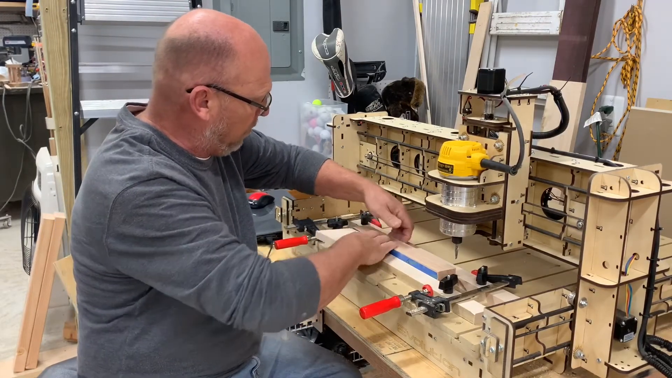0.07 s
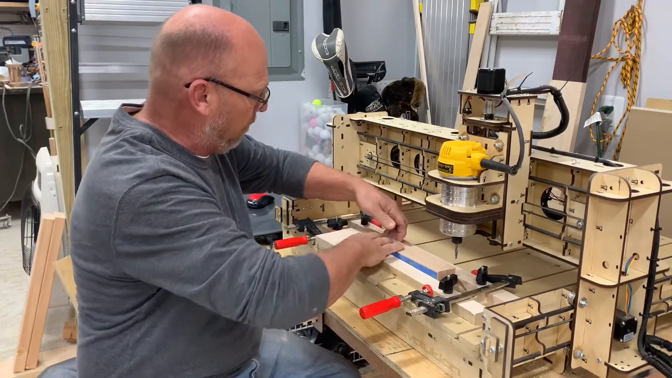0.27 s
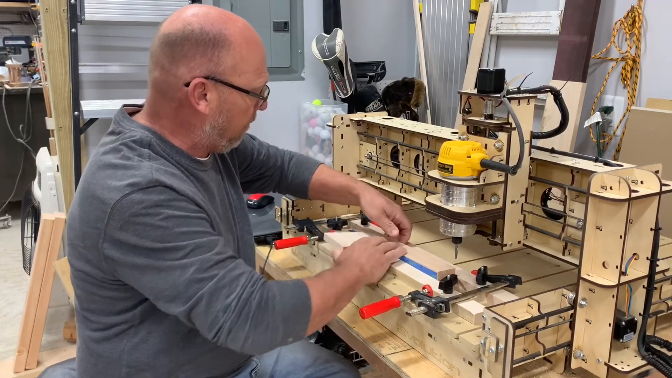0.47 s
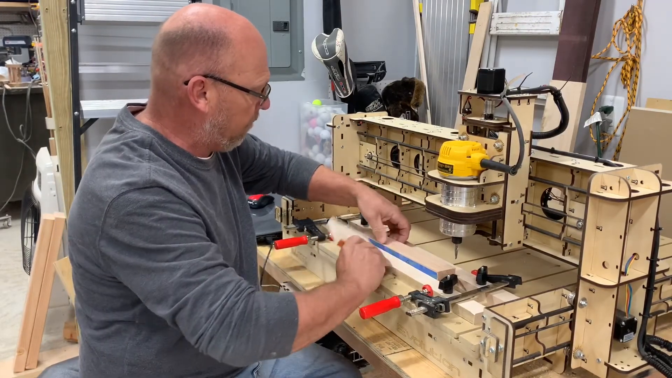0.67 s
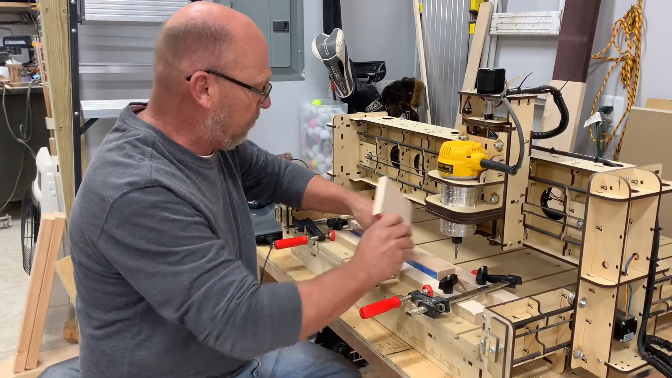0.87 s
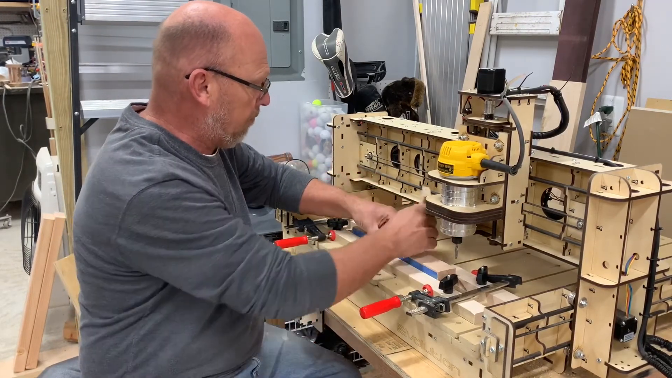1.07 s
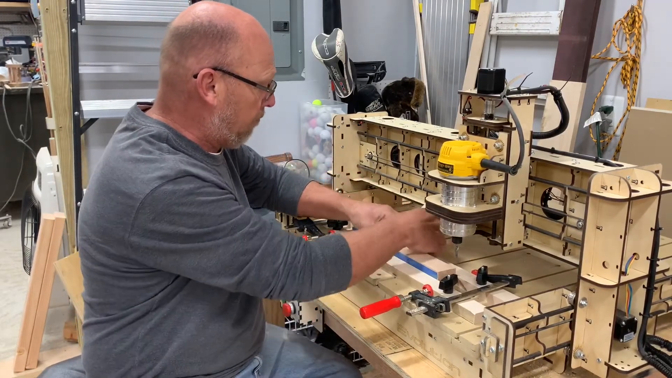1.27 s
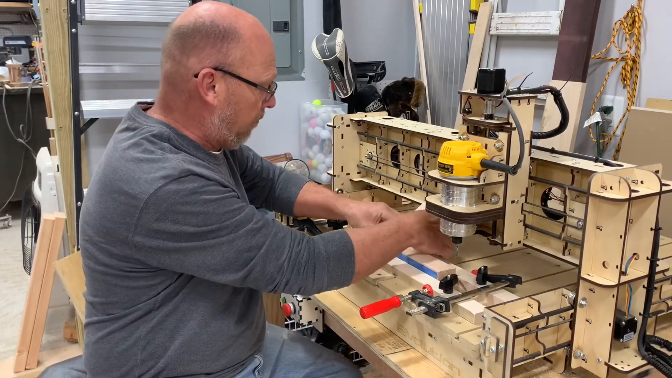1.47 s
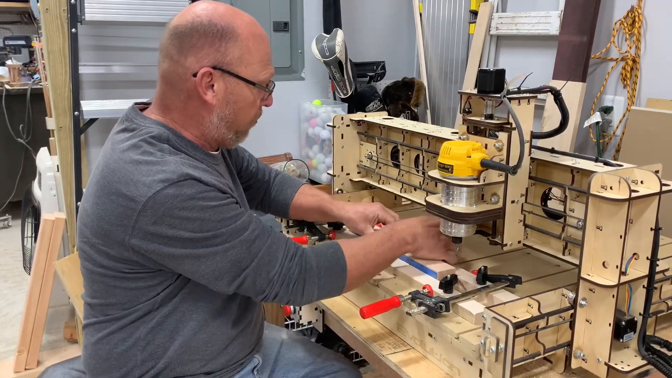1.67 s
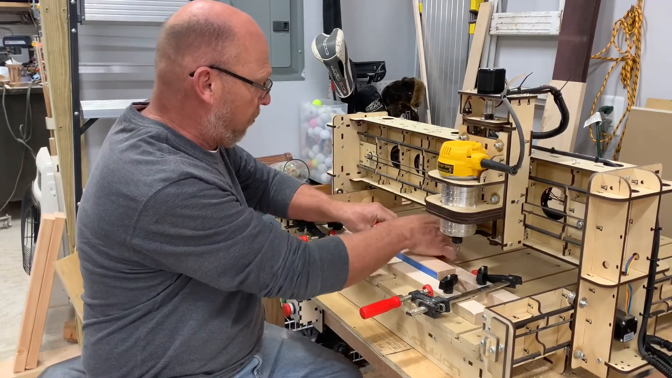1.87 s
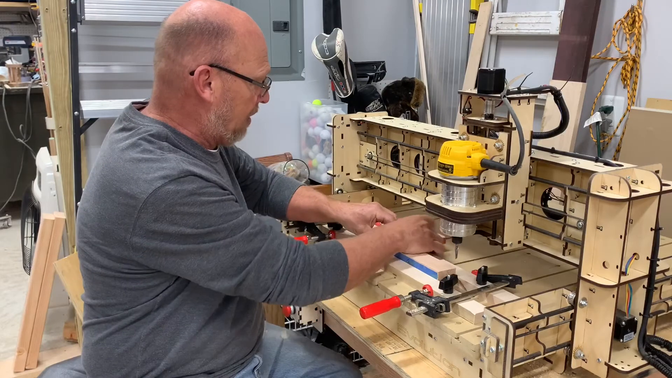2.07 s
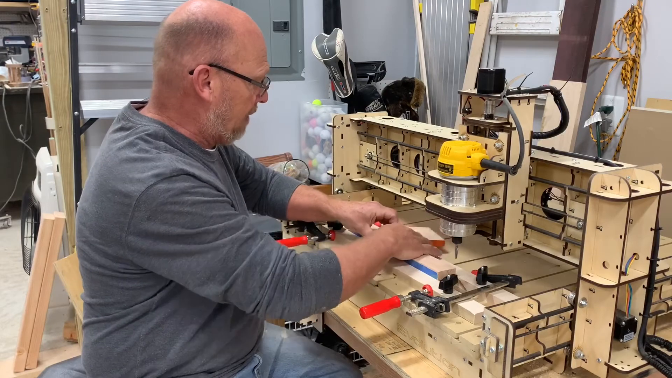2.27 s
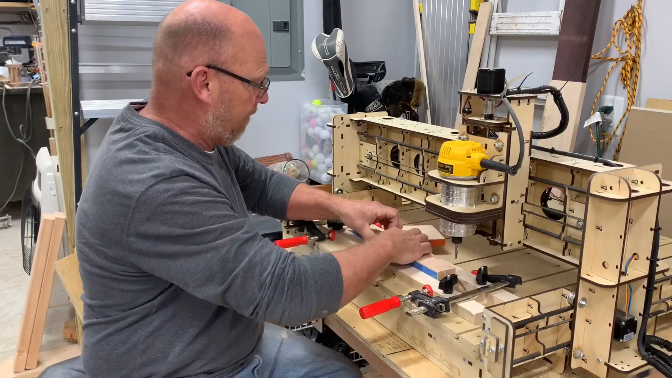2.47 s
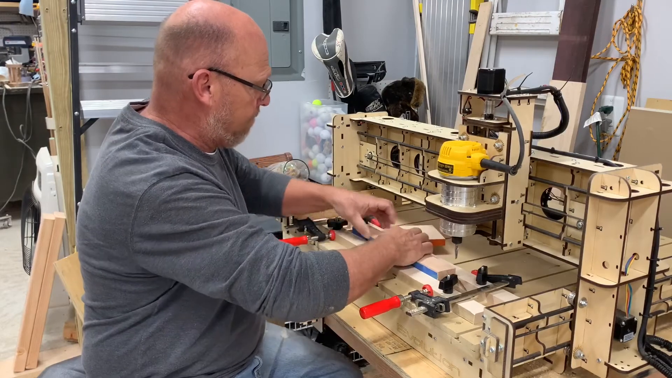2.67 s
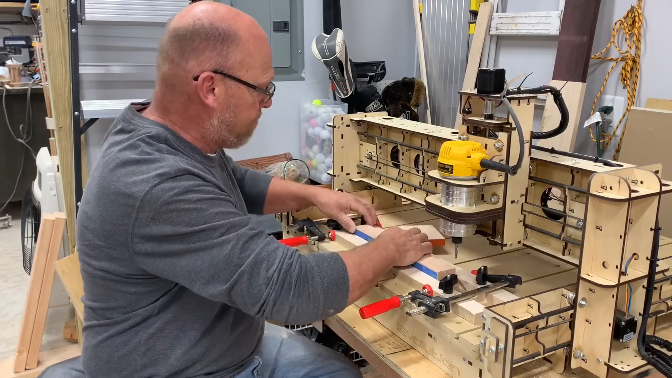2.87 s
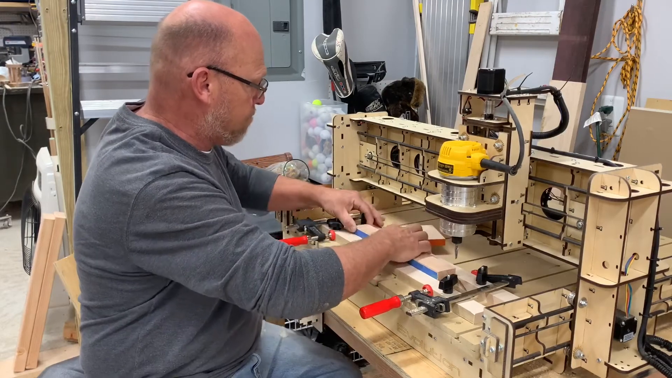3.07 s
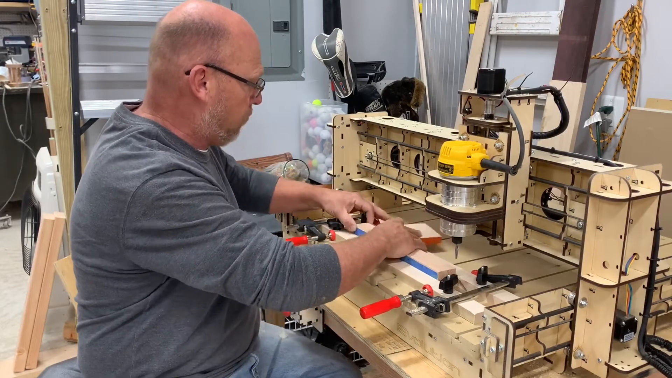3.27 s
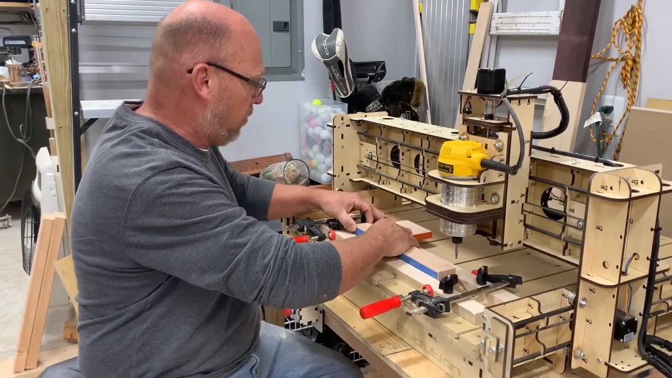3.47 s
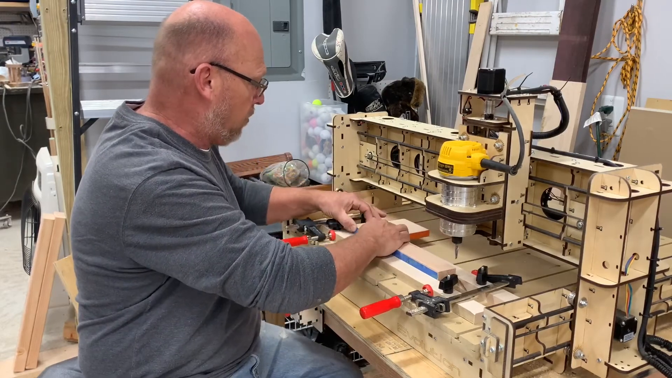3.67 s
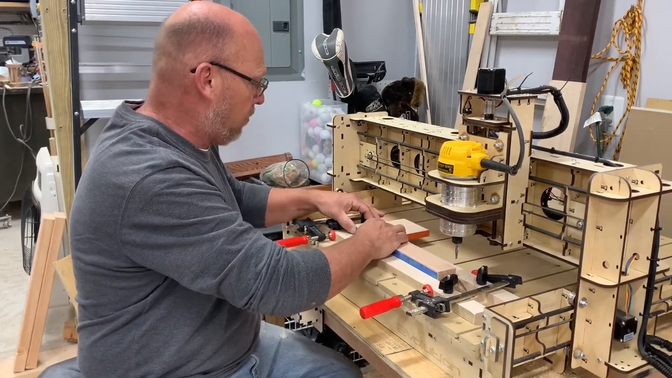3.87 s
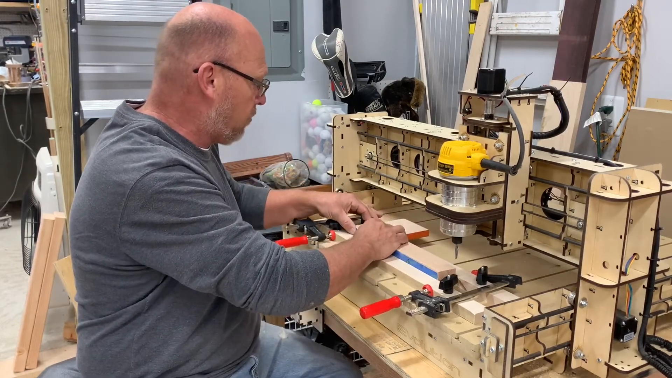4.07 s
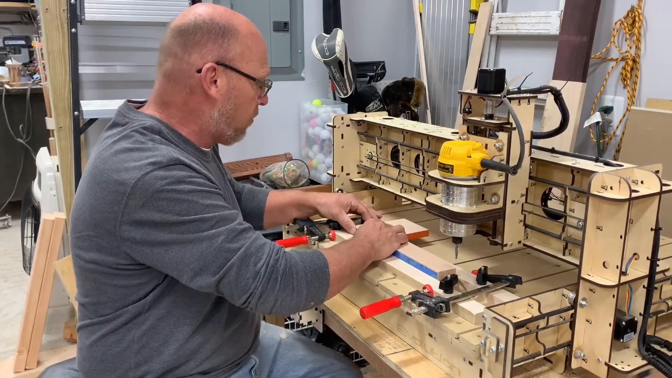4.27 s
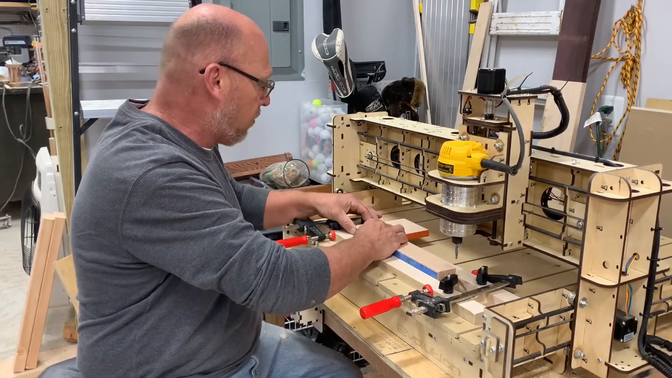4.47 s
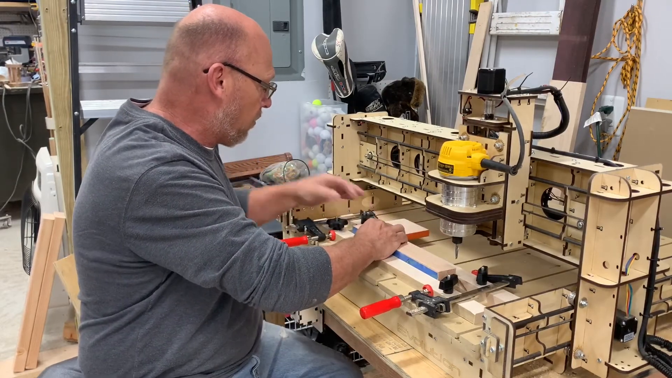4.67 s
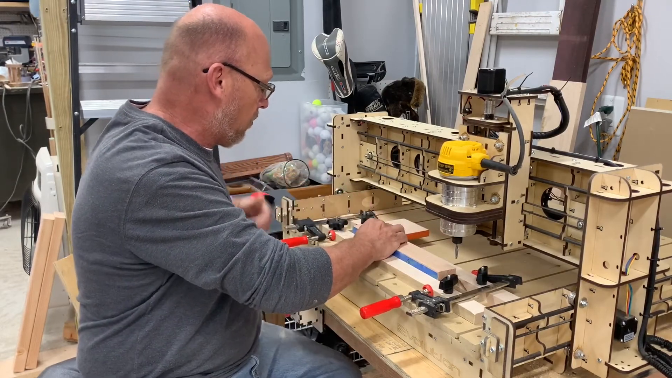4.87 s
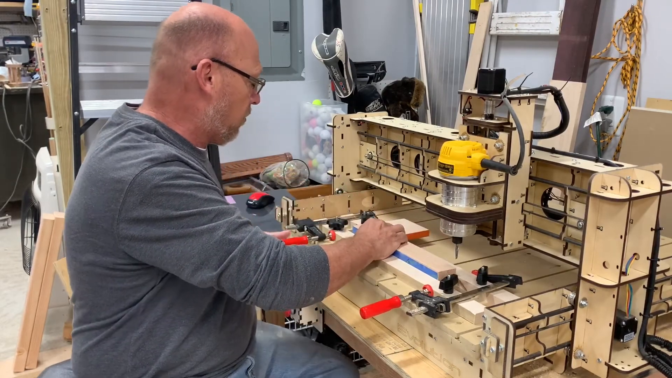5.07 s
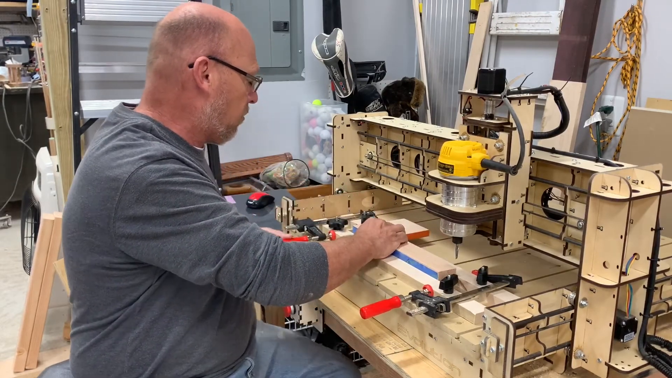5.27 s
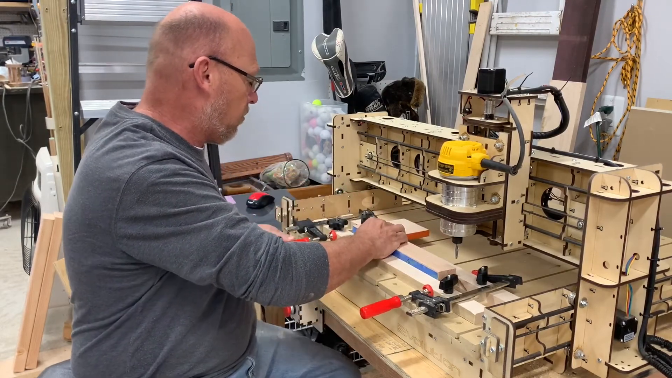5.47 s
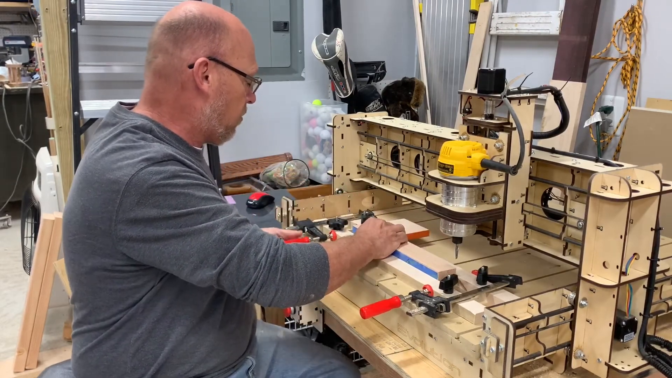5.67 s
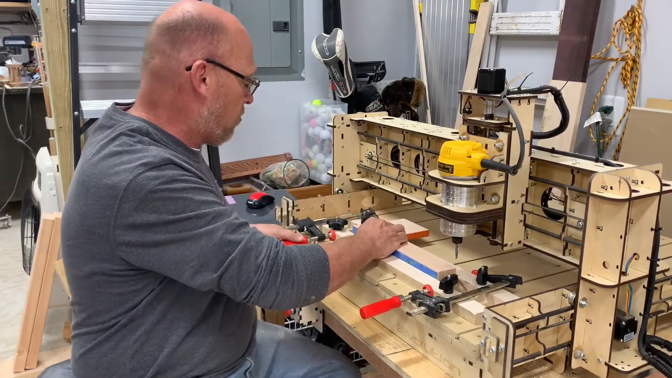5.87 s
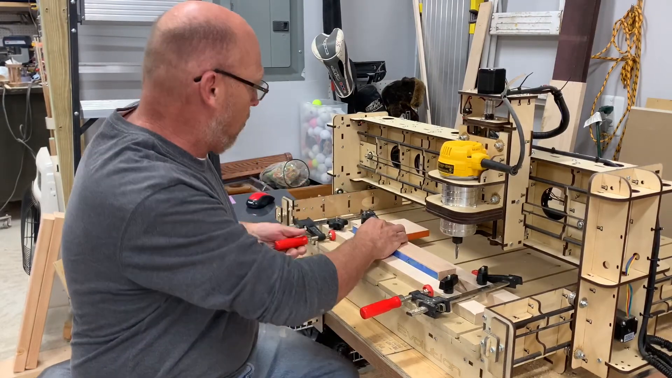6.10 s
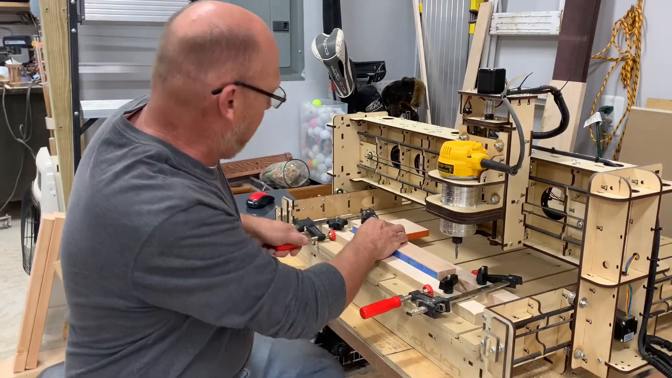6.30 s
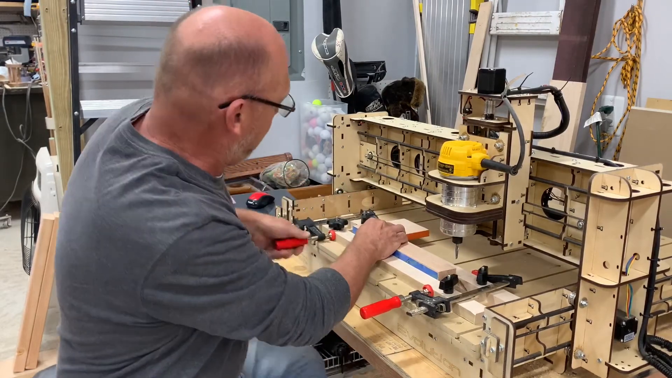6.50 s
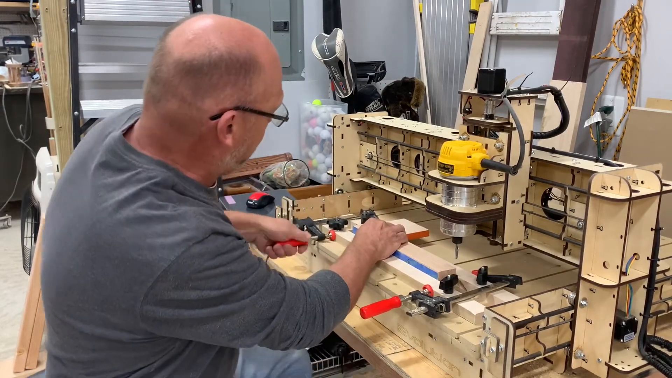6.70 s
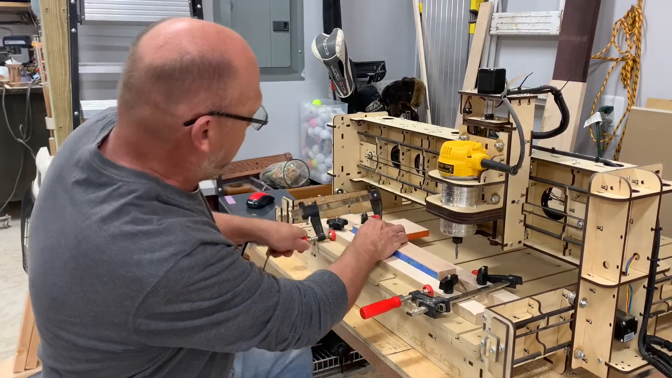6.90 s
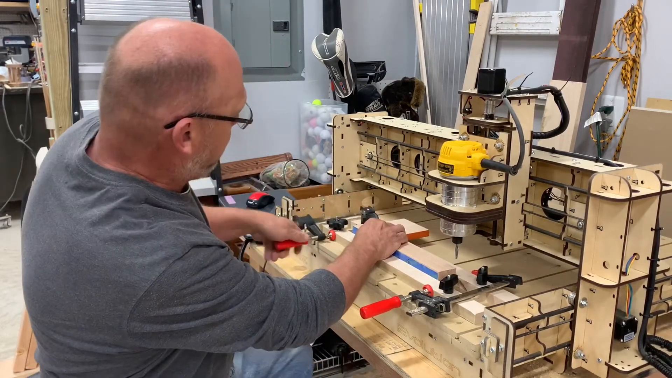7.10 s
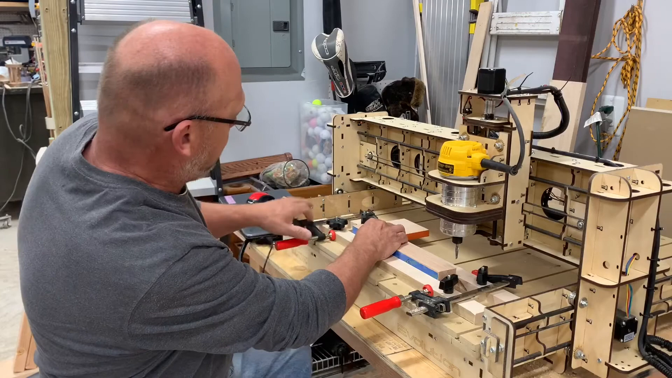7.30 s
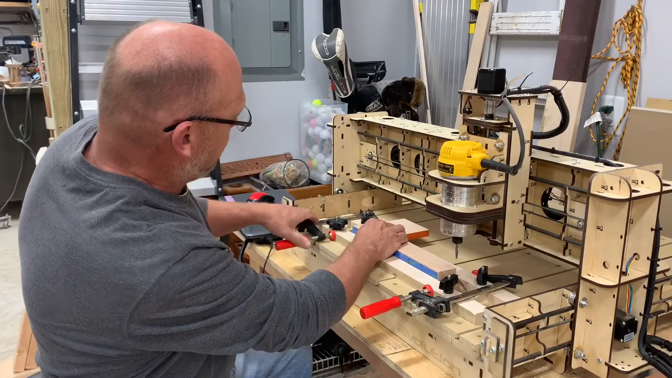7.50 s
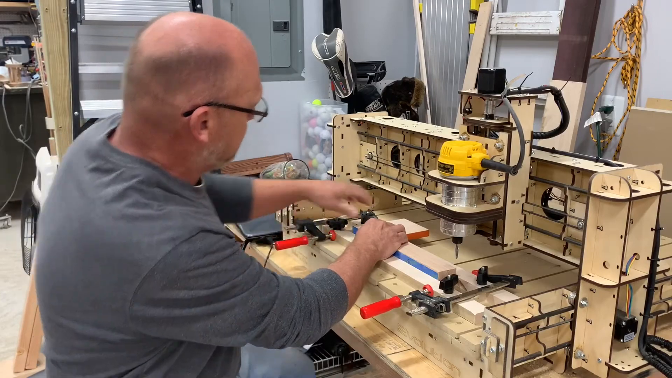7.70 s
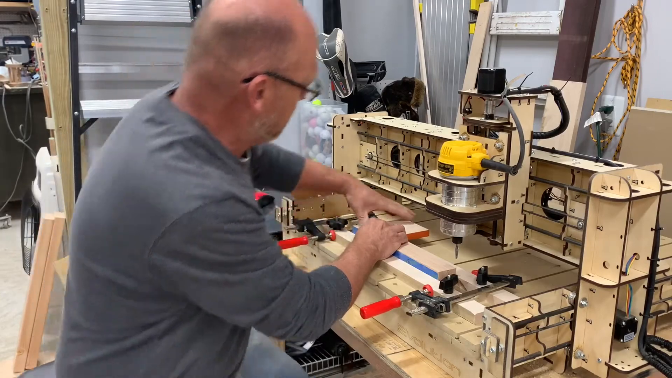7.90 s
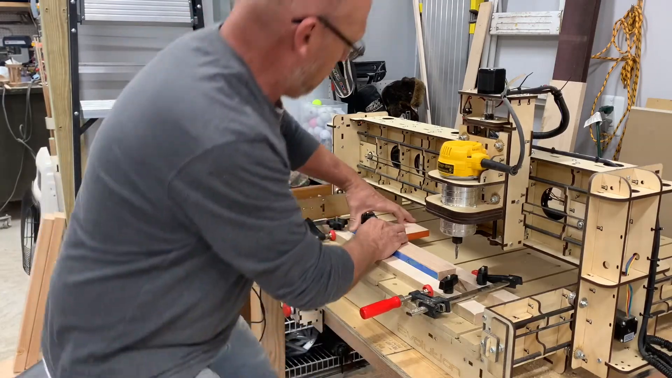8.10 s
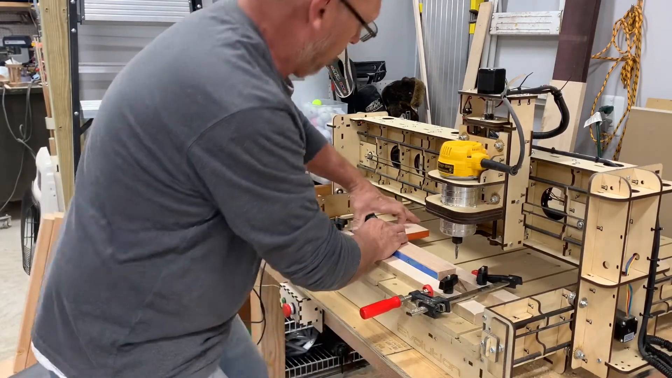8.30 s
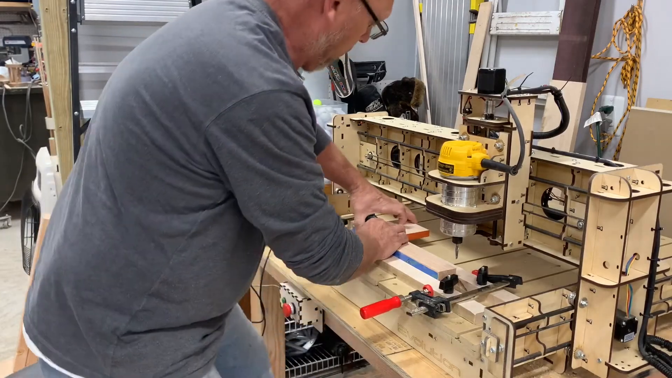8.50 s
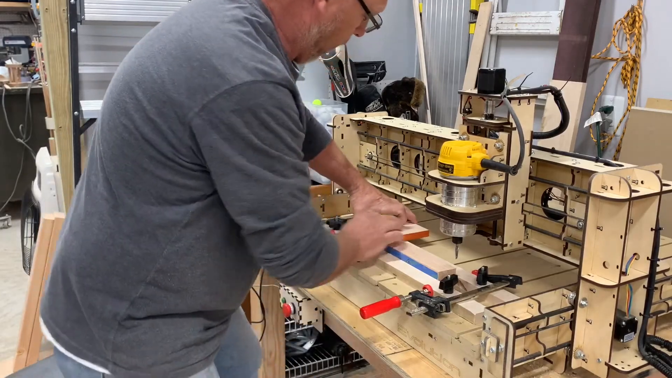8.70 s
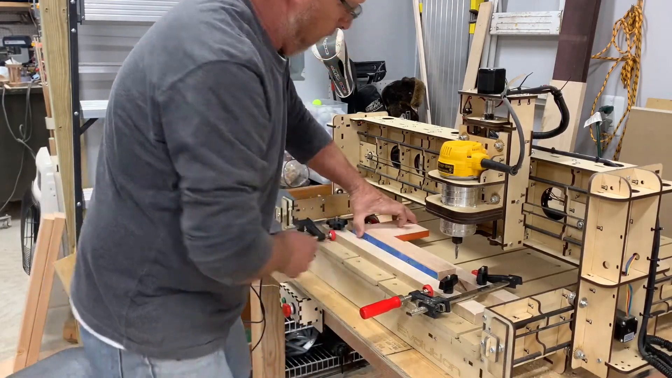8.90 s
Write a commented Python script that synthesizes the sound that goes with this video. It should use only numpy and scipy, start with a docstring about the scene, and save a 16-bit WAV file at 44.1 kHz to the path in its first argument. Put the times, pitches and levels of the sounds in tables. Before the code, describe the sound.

Close stereo pickup in a quiet workshop with a short room ring. A board is knocked and scuffed onto a hollow plywood bed, then come soft fingertip taps. Clamp parts rattle and scrape, a rod slides with a brief mid-pitched singing tone, and two hard snaps follow. A low creaking groan and faint handling end it, over a low hum.

```python
"""A quiet workshop: filtered noise gives faint air and a low hum that swells at times, sines a thin whine.
A board is laid on a plywood machine bed and tapped into place: blows excite resonances of wood and bed.
Hands and wood scuff over the bed as swells of shaped noise; rubbed parts squeak as ringing noise.
Then it is clamped: a clamp rod sings as it slides, with octave and upper modes, and a lever snaps shut.
Decaying noise tails let the room ring for up to half a second."""
import sys
import numpy as np
from scipy import signal
from scipy.fft import rfft, irfft, next_fast_len
from scipy.io import wavfile
from scipy.ndimage import map_coordinates

SR = 44100
rng = np.random.default_rng(int(sys.argv[2]) if len(sys.argv) > 2 else 0)


def waveform_to_disk(signal):
    """Save audio, clipped to [-1, 1], as 16-bit WAV at the path in sys.argv[1]."""
    frames = np.transpose(np.atleast_2d(signal))
    scaled = np.clip(frames, -1, 1) * 32767
    samples = np.round(scaled).astype(np.int16)
    wavfile.write(sys.argv[1], SR, samples)


N = 394650

# Every spectrum level is relative: the layer's loudness is set elsewhere.
# Low hum: spectrum (freq_hz, level_db per Hz)
HUM_SPECTRUM = [(12, -68.5), (20, -33.5), (32, -24.5), (41, -13), (59, 2), (113, -2), (176, -25.5),
                (200, -10.5), (260, -37.5), (440, -120)]
# Its loudness, swelling at times, as after the heavy blow near 7.2 s: (time_s, level_db before it wavers)
HUM_LEVEL = [(0.0, -60.5), (0.45, -62.5), (3.0, -61.5), (3.49, -55), (3.7, -58.5), (5.8, -60.5), (6.0, -50),
             (6.45, -57.5), (7.05, -62), (7.22, -40.5), (7.6, -63), (7.88, -53), (8.1, -59), (8.95, -56)]
# Air noise: spectrum (freq_hz, level_db per Hz)
AIR_SPECTRUM = [(88, -32.5), (150, -4.5), (495, -25), (608, -25.5), (1150, -34), (6760, -40.5),
                (8460, -50.5), (9460, -43), (10600, -40.5), (12100, -43), (13000, -57)]
AIR_DB = -70.5  # rms
# Pair of high electric tones: (pitch_hz, level_db rms before they waver)
WHINE_TONES = [(14874, -62.5), (14939, -68)]

# Swells of rubbing noise, some leading into knocks:
# (fullest_s, rise_s, fall_s, rub_db before the mix, hiss_over_rub_db, rumble_over_rub_db)
RUB_SWELLS = [(0.047, 0.091, 0.075, -56.5, -10.5, 3.5), (0.468, 0.22, 0.19, -55, -9, 1.5),
              (0.584, 0.061, 0.064, -52.5, -4, 6), (1.0, 0.18, 0.12, -69.5, -13, 14.5),
              (1.455, 0.047, 0.11, -70, -5, 9), (1.548, 0.08, 0.043, -48, -7, -2),
              (1.87, 0.15, 0.12, -62.5, -9.5, 16.5), (2.03, 0.18, 0.21, -62.5, -10, 4),
              (2.3, .08, 0.07, -79, -12, 32), (2.412, 0.04, 0.13, -78.5, -11, 28),
              (3.0, 0.067, 0.079, -77.5, -8, 14.5), (3.251, 0.17, 0.12, -64, -3.5, 10.5),
              (3.66, 0.13, 0.09, -68.5, -21, 8), (3.78, 0.17, 0.45, -86, -13.5, 24.5),
              (3.97, 0.11, 0.12, -76, -12, 11), (5.765, 0.033, 0.096, -63, -10, 13),
              (5.85, .06, .05, -67, 1, 5), (5.935, .035, 0.24, -52, 6.5, 1),
              (6.02, .12, 0.1, -50.5, 8, -15), (6.25, 0.48, 0.18, -64.5, -3, 13.5),
              (6.51, 0.13, 0.25, -46.5, 0.5, 8), (6.648, 0.27, 0.08, -45, -6, 10),
              (6.9, 0.1, 0.36, -75, -8, 9.5), (7.12, 0.11, 0.091, -56, 10, 0),
              (7.49, 0.056, 0.081, -60.5, 4, -1.5), (7.585, 0.11, 0.14, -53, 12.5, 0),
              (7.921, 0.23, 0.206, -53.5, -3, 14), (8.053, 0.094, 0.15, -55, 3, -5),
              (8.271, 0.12, 0.28, -68.5, -1, 12), (8.6, 0.076, 0.12, -76, -3.5, 11.5),
              (8.76, 0.11, .08, -77.5, -1.5, 14.5), (8.95, 0.18, .1, -65.5, 1.5, 7)]
SWELL_FADE_DB, SWELL_SHAPE = 23, 1.42  # loss over one rise or fall, roundness of the crest
# Spectra of grit hiss, fine hiss, wood grain and coarse bumps: (freq_hz, level_db per Hz)
HISS_SPECTRUM = [(1180, -29), (2000, -5.5), (2260, -4.5), (4230, -3), (7030, -7.5), (8200, -2),
                 (10700, -33.5), (18000, -120)]
FINE_SPECTRUM = [(5410, -37.5), (9200, -5.5), (10300, -5.5), (12600, -5), (16400, -36.5), (22000, -120)]
RUB_SPECTRUM = [(500, -30.5), (800, 1.5), (1300, -0.5), (1800, -1.5), (2500, -7), (3300, -26), (5000, -65)]
RUMBLE_SPECTRUM = [(59, -37), (100, -19.5), (242, -3), (404, -2), (448, -10.5), (652, -13.5), (900, -30),
                   (1170, -58.5), (1980, -120)]
FINE_DB, FINE_GROWS = -12, 0.4  # fine hiss against the hiss; more of it in bright swells (dB per dB)
GRIT_SPLIT_HZ, GRIT_DULLS = 2900, 0.26  # above the split, weak hiss loses this much more (dB per dB)

# Board and blocks meeting the bed:
# (start_s, strength_db, favoured_pitch_hz, rap_over_strength_db, thud_over_strength_db, click_over_strength_db)
BOARD_KNOCKS = [(0.0683, -27, 2320, 4.5, 4, -10.5), (0.3653, -39.5, 902, -20, -9, -29),
                (0.5649, -48.5, 2300, -11, 1, -5.5), (0.804, -48.5, 1390, -3, -5, -21),
                (1.1205, -34, 1740, 4.5, 2.5, -12.5), (1.2732, -48.5, 1870, -2.5, 10.5, -22),
                (1.4208, -58.5, 1800, 13.5, 4.5, -3), (1.5664, -36, 1700, 9.5, -4, -11),
                (1.5871, -25.5, 1210, -9.5, -6, -32), (1.9042, -30.5, 1180, 0, -4, -35),
                (2.142, -34.5, 912, -8, -5, -43), (3.2865, -28.5, 1780, 10, -2.5, -7)]
# The steel clamp and its lever: same columns as the board knocks
CLAMP_KNOCKS = [(5.224, -47, 1010, -10, 3.5, -41), (5.407, -31, 930, -4, 7, -16),
                (5.7518, -49.5, 920, -1, 5.5, -12), (5.9067, -50, 2440, -8, -3, 3.5),
                (5.926, -31, 1340, -4.5, 6, -10), (6.168, -41.5, 1408, 3, -2.5, -24),
                (6.3078, -40, 1090, 1.5, 1.2, -26), (6.3426, -36.5, 902, -15, 3, -23),
                (7.0286, -15.5, 2027, 7, 4.5, -6.5), (7.1232, -19, 1030, -2, 1, -11),
                (7.7533, -28, 1170, -2.5, -12, -21), (8.2358, -44.5, 906, -9.5, -0.5, -14)]
# Light fingertip taps: (start_s, strength_db)
FINGER_TAPS = [(0.9774, -68), (2.2272, -64), (2.4082, -61), (2.512, -70.5), (2.988, -63), (3.1563, -57),
               (3.6107, -59.5), (3.6472, -57.5), (3.9977, -59), (4.2015, -63), (4.3321, -57.5),
               (4.3852, -58.5), (4.5208, -60), (4.6321, -55), (4.7188, -58), (4.8, -57.5), (5.1224, -55),
               (5.2575, -58), (8.3417, -62.5)]
# What every fingertip tap shares:
# favoured_pitch_hz, rap_over_strength_db, thud_over_strength_db, click_over_strength_db
FINGER_SHARED = (1270.5, -4.5, 2, -29)
# Boom over the thud for each kind of blow: level_db
BOOM_OVER_THUD = {"board": -20.5, "clamp": -19.5, "finger": -7.5}
# Treble limit of rap and click for each kind of blow, wood duller than steel: limit_hz
BLOW_TOP = {"board": 6560, "clamp": 20100, "finger": 3480}
# Resonances of the board, the upper and the low bed, and the bench: (pitch_hz, width_hz, relative level_db)
BOARD_MODES = [(960, 120, 1.2), (1263, 240, 4), (1670, 570, 1.5), (2110, 380, 1.5), (2760, 710, -6.5)]
UPPER_BED_MODES = [(341, 54.5, 1), (416, 50, -1), (500, 52, -1.5), (606.4, 72, -1.5), (674, 77, -4.5),
                   (792, 99, -6.5)]
LOW_BED_MODES = [(152, 15, -6.5), (205.3, 17, 2.24), (249.7, 28, 2.5), (283.2, 39, -1)]
BENCH_MODES = [(67, 5.8, -3), (112.5, 11, 4)]
# Contact click: spectrum (freq_hz, level_db per Hz)
CLICK_SPECTRUM = [(1500, -13.5), (2800, -5.6), (4500, -12.5), (7500, -13), (9500, -24), (16000, -33)]
SPOT_DB, SPOT_SHARP = 4, 9  # the mode right under the blow: added level, pitch over width
TAP_TOP_HZ = 1600  # the padded tap carries little above this

# Squeaks and groans of rubbed parts:
# (start_s, end_s, pitch_hz, level_db before swell and mix, width_hz of a resonance applied twice)
SQUEAKS = [(0.463, 0.673, 2290, -67.5, 40), (1.416, 1.581, 1780, -58, 250), (2.138, 2.3, 2207, -79, 67),
           (4.622, 4.74, 1330, -71, 250), (7.475, 7.622, 354.5, -59, 20), (7.77, 7.883, 412, -42.5, 20),
           (7.875, 8.024, 238.5, -41, 54), (7.89, 7.97, 128, -48, 25), (7.883, 8.053, 655, -50, 20),
           (7.888, 8.024, 787, -53, 20), (8.618, 8.851, 2687, -76.5, 32)]

# Singing rod: (time_s, grip_db)
ROD_GRIP = [(6.33, -30), (6.35, -37.5), (6.41, -45.5), (6.474, -32.5), (6.615, -28), (6.635, -35.5),
            (6.672, -23.5), (6.775, -52), (6.797, -38), (6.9, -56.5), (7.02, -45.5)]
# Upper rod modes: (pitch_hz, level_db against one another, growth in dB per dB of grip)
ROD_UPPER = [(806, -21.5, 2.5), (1310, -22.5, 1.6), (2720, -22, 1.2), (5200, -33.5, 2.4)]
ROD_HZ, ROD_FLAT_HZ, ROD_SETTLE_S = 339.3, 23.7, 0.053  # pitch, how flat it starts, how soon it settles
OCTAVE_DB, OCTAVE_GROWS = -36.5, 1.03  # octave at a grip of -29.5 dB, dB per dB of grip
OVERTONES_LOCK_S, ROD_STOP_S = 6.5, 6.68  # overtones join fully; the slide ends and they ring out
UPPER_DIE_DB_PER_S, OCTAVE_DIE_DB_PER_S = 250.5, 54.5

# Likeness of left and right in diffuse sound: (freq_hz, correlation)
ALIKE = [(60, 0.96), (130, 0.96), (290, 0.9), (640, 0.35), (1400, 0.052), (8000, 0.015)]
# Room decay: (freq_hz, t60_s)
ROOM_DECAY = [(60, 0.41), (200, 0.37), (1000, 0.47), (4000, 0.46), (10000, 0.25)]
# What the walls return: (freq_hz, gain_db)
WALL_RETURN = [(100, 1), (250, -3), (600, -1.5), (3000, -2), (9000, -4.5)]
# Direct sound at the two ports: (freq_hz, left_lead in radians)
LEFT_LEAD = [(0, 0.5), (4400, 1.25), (6800, 1.2), (8000, -3.5), (9400, -1), (10400, -11.5), (11600, -5.5),
             (12600, -11), (15000, -11.5), (22000, -17)]
# Overall tone, with gaps near 8.8 kHz and 13-14 kHz: (freq_hz, gain_db)
OVERALL_TONE = [(20, 1.98), (7800, 2), (8300, -10), (8800, -19.5), (9300, 5.5), (12400, 4), (12900, -23),
                (14300, -22.5), (14700, 6), (15200, -1), (15700, -30.5)]
TOP_HZ = 16800  # nothing is heard from here up


def amp(db):
    """Gain of a level in dB."""
    return 10 ** (np.asarray(db) / 20)


def unit(x):
    """Scaled to rms 1."""
    return x / np.sqrt(np.mean(x ** 2) + 1e-20)


def along(points, hz):
    """Value at each frequency, read from (Hz, value) points on a log axis."""
    f, v = np.transpose(points)
    return np.interp(np.log(hz + 1), np.log(f + 1), v)


def level_curve(rows):
    """One level per sample, drawn straight between (s, dB) points."""
    return np.interp(np.arange(N) / SR, *np.transpose(rows))


def wobble(rate):
    """A smooth random curve, rate knots a second."""
    knots = rng.standard_normal(int(N * rate / SR) + 4)
    return map_coordinates(knots, [np.arange(N) * rate / SR])


def filtered(x, response):
    """Sound passed through a complex response of frequency."""
    n = x.shape[-1]
    m = next_fast_len(n + 2048, True)  # room for the ringing
    return irfft(rfft(x, m) * response(np.fft.rfftfreq(m, 1 / SR)), m)[..., :n]


def coloured(x, spectrum):
    """Noise shaped by a spectrum, rms 1."""
    return unit(filtered(x, lambda hz: amp(along(spectrum, hz))))


def body(modes):
    """Causal response of a set of resonances, neighbours in opposite polarity."""
    def response(f):
        total = 0
        for k, (pitch, width, db) in enumerate(modes):
            damping = 1j * f * width
            total = total + (-1) ** k * amp(db) * damping / (pitch * pitch - f * f + damping)
        return total
    return response


def diffuse(pairs):
    """Unrelated noise pairs made alike in the bass, as at two close ports."""
    def mid_side(hz):
        turn = np.arccos(np.clip(along(ALIKE, hz), -1, 1)) / 2
        return np.array([np.cos(turn), np.sin(turn)])
    mid, side = np.moveaxis(filtered(pairs, mid_side), -2, 0)
    return np.stack([mid + side, mid - side], -2)


def tails(count):
    """Room answers as diffuse noise; each frequency dies at its own speed, then the walls tint it."""
    noise = diffuse(rng.standard_normal((count, 2, int(0.6 * SR))))
    hz, t, bands = signal.stft(noise, SR, nperseg=256)
    decay = amp(-60 * t / along(ROOM_DECAY, hz)[:, None])
    tail = signal.istft(bands * decay, SR, nperseg=256)[1]
    tail = tail * (1 - np.exp(-np.arange(tail.shape[-1]) / (0.0011 * SR)))  # reflections thicken
    tail = tail / np.linalg.norm(tail, axis=-1, keepdims=True)  # energy 1 before the walls
    return filtered(tail, lambda hz: amp(along(WALL_RETURN, hz)))


def at_ports(x):
    """The direct sound reaches the two ports out of step."""
    sides = np.array([[1], [-1]])
    return filtered(x, lambda hz: np.exp(0.5j * np.interp(hz, *np.transpose(LEFT_LEAD)) * sides))


def background():
    """A low hum that swells at times, faint air noise, and a wavering pair of high electric tones."""
    hum_gain = amp(level_curve(HUM_LEVEL) + 1.3 * wobble(7.5))
    hum = hum_gain * coloured(diffuse(rng.standard_normal((2, N))), HUM_SPECTRUM)
    air = amp(AIR_DB) * coloured(diffuse(rng.standard_normal((2, N))), AIR_SPECTRUM)
    t = np.arange(N) / SR
    whine = np.zeros(N)
    for hz, db in WHINE_TONES:
        gain = np.sqrt(2) * amp(db + 1.5 * wobble(9) + 2.1 * wobble(35))
        drift = 1.6 * wobble(45) + 0.25 * wobble(250)
        whine += gain * np.sin(2 * np.pi * hz * t + drift)
    return hum + air + at_ports(whine)


def scuffs():
    """Swells of rubbing noise: grit hisses, the grain of the wood rubs, coarse bumps shake the bed."""
    def rough(db, rate):
        return rng.standard_normal(N) * amp(db * wobble(rate))
    hiss = coloured(rough(1.3, 200), HISS_SPECTRUM)
    low_hiss = filtered(hiss, lambda hz: 1 / (1 + (hz / GRIT_SPLIT_HZ) ** 4))
    fine = coloured(rough(1.5, 100), FINE_SPECTRUM)
    rub = coloured(rough(3.5, 60), RUB_SPECTRUM)
    rumble = coloured(rough(3.6, 40), RUMBLE_SPECTRUM)
    layers = [low_hiss, hiss - low_hiss, fine, rub, rumble]
    power = np.zeros((len(layers), N))  # overlapping swells add in power
    for s, rise, fall, rub_db, hiss_db, rumble_db in RUB_SWELLS:
        on = np.arange(max(round((s - 2 * rise) * SR), 0), min(round((s + 2 * fall) * SR), N))
        late = on / SR - s
        distance = np.abs(late / np.where(late < 0, rise, fall))
        swell_db = rub_db - SWELL_FADE_DB * distance ** SWELL_SHAPE
        high_hiss_db = hiss_db + GRIT_DULLS * min(hiss_db - 5, 0)
        fine_db = (1 + FINE_GROWS) * hiss_db + FINE_DB
        mix_db = np.array([hiss_db, high_hiss_db, fine_db, 0, rumble_db])[:, None]
        power[:, on] += amp(swell_db + mix_db) ** 2
    return np.sum(np.sqrt(power) * layers, axis=0)


def blows_table():
    """Every blow as (s, rap dB, pitch Hz, tap dB, thud dB, boom dB, click dB, treble limit Hz)."""
    fingers = [(s, db, *FINGER_SHARED) for s, db in FINGER_TAPS]
    blows = []
    for kind, rows in {"board": BOARD_KNOCKS, "clamp": CLAMP_KNOCKS, "finger": fingers}.items():
        for s, db, hz, rap, thud, click in rows:
            boom_db = db + thud + BOOM_OVER_THUD[kind]
            blows.append((s, db + rap, hz, db, db + thud, boom_db, db + click, BLOW_TOP[kind]))
    return blows


def knocks():
    """Each blow clicks, raps the board, thumps the bed and booms in the bench, with a room tail after it."""
    t = np.arange(int(0.2 * SR)) / SR
    rows = blows_table()
    rap_db, pitch_hz, tap_db, thud_db, boom_db, click_db, top_hz = np.transpose(rows)[1:, :, None]

    def push(s):  # one clean contact
        return np.exp(-t / s) * np.ones((len(rows), 1))

    def soft(s):  # a padded contact
        return t / s * push(s)

    def chatter(t60):  # parts settling
        return rng.standard_normal((len(rows), len(t))) * amp(-60 * t / t60)

    def held(x, s):  # energy of full level held s seconds
        return x / np.linalg.norm(x, axis=1, keepdims=True) * np.sqrt(s * SR)

    # the spot struck favours the modes near its pitch
    favoured = body([(pitch_hz, pitch_hz / 0.73, 0)])
    spot = body([(pitch_hz, pitch_hz / SPOT_SHARP, SPOT_DB)])
    rap = filtered(soft(0.00004) + 0.16 * chatter(0.034),
                   lambda f: (favoured(f) + spot(f)) * body(BOARD_MODES)(f) / (1 + 1j * f / top_hz) ** 2)
    tap = filtered(soft(0.00016) + 0.15 * chatter(0.035),
                   lambda f: body(UPPER_BED_MODES)(f) / (1 + 1j * f / TAP_TOP_HZ) ** 2)
    settling = 2.0 * chatter(0.082) * (1 - np.exp(-t / 0.011))
    thud = filtered(soft(0.0004) + settling, body(LOW_BED_MODES))
    boom = filtered(push(0.002), body(BENCH_MODES))
    tick = np.roll(push(0.00002) + 0.064 * chatter(0.035), SR // 1000, axis=1)  # 1 ms later
    click = filtered(tick, lambda hz: amp(along(CLICK_SPECTRUM, hz)) / (1 + (hz / top_hz) ** 4))

    blows = amp(rap_db) * held(rap, 0.00073) + amp(tap_db) * held(tap, 0.0042)
    blows += amp(thud_db) * held(thud, 0.0041) + amp(boom_db) * held(boom, 0.0099)
    blows += amp(click_db) * held(click, 0.0027)
    pooled_tails = tails(count=9)[np.arange(len(rows)) % 9]  # nine random room tails, reused in turn
    echoes = signal.fftconvolve(blows[:, None], pooled_tails, axes=2)
    direct, wet = np.zeros(N + SR), np.zeros((2, N + SR))
    for row, blow, echo in zip(rows, blows, echoes):
        i = round(row[0] * SR)
        direct[i:i + len(t)] += blow
        late = i + 130  # the room answers 3 ms later
        wet[:, late:late + echo.shape[1]] += echo
    return at_ports(direct[:N]) + amp(5.0) * wet[:, :N]


def squeaks():
    """Rubbing that briefly catches one mode: a fuzzy tone that swells and fades."""
    out = np.zeros(N)
    for start, end, hz, db, width_hz in SQUEAKS:
        i, n = round(start * SR), round((end - start) * SR)
        mode = body([(hz, width_hz, 0)])
        ringing = filtered(rng.standard_normal(SR // 2), lambda f: mode(f) ** 2)
        swell = np.sqrt(np.sin(np.pi * np.arange(n) / n))
        out[i:i + n] += amp(db) * swell * unit(ringing[-n:])
    return out


def rod():
    """Stick-slip locks to the rod's pitch and drives its octave and upper modes; the grip is unsteady."""
    t = np.arange(N) / SR
    start, end = ROD_GRIP[0][0], ROD_GRIP[-1][0]
    gate = np.clip(np.minimum(t - start, end - t) / 0.029, 0, 1)
    grip_db = level_curve(ROD_GRIP)
    hz = ROD_HZ - ROD_FLAT_HZ * np.exp(-np.abs(t - start) / ROD_SETTLE_S)
    locked_db = -130 * np.clip(OVERTONES_LOCK_S - t, 0, 1)
    free_s = np.clip(t - ROD_STOP_S, 0, 1)
    phase = 2 * np.pi * np.cumsum(hz) / SR + 0.54 * wobble(30)
    first = amp(grip_db + 2.0 * wobble(67)) * np.sin(phase)

    octave_db = OCTAVE_DB + OCTAVE_GROWS * (grip_db + 29.5) + locked_db - OCTAVE_DIE_DB_PER_S * free_s
    octave = amp(octave_db + 1.5 * wobble(50)) * np.sin(2 * phase + 0.14 * wobble(30))

    upper = np.zeros(N)
    for mode_hz, db, grows in ROD_UPPER:
        mode_db = db - 32.5 + grows * (grip_db + 28) + locked_db - UPPER_DIE_DB_PER_S * free_s
        tone = np.sin(2 * np.pi * mode_hz * t + 3 * wobble(70))
        upper += amp(mode_db + 1.8 * wobble(60)) * tone
    return np.sqrt(2) * gate * (first + octave + upper)


def scene():
    """Everything at the bench, direct and through the room; the rod goes to the room slightly weaker."""
    sliding, singing = scuffs() + squeaks(), rod()
    to_room = sliding + amp(-2.5) * singing
    wet = signal.fftconvolve(to_room[None], tails(count=1)[0], axes=1)[:, :N]
    direct = at_ports(amp(-2.0) * sliding + singing)
    return background() + knocks() + direct + amp(-1) * wet


def record(dry):
    """Overall tone: gaps near 8.8 kHz and 13-14 kHz, nothing above 16.8 kHz."""
    return filtered(dry, lambda hz: amp(along(OVERALL_TONE, hz)) * (hz < TOP_HZ))


dry = scene()
out = record(dry)
waveform_to_disk(out)
```